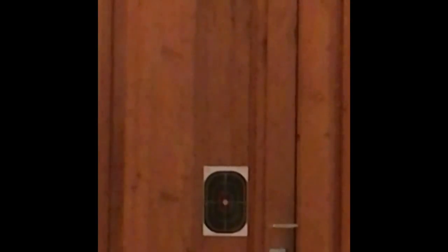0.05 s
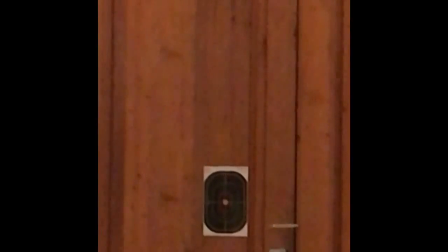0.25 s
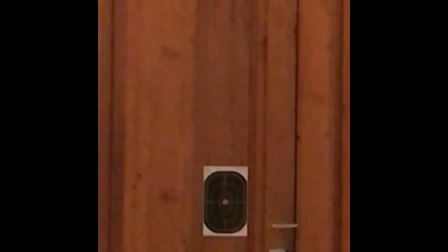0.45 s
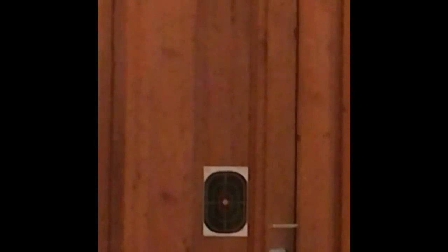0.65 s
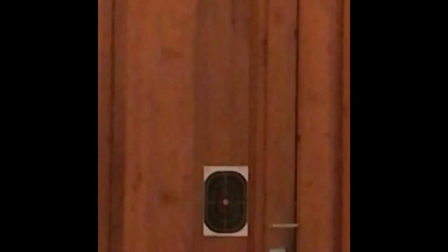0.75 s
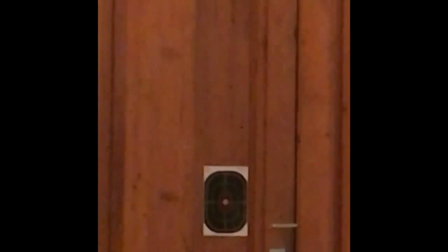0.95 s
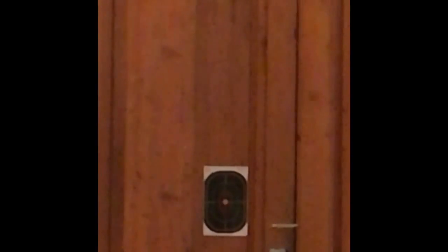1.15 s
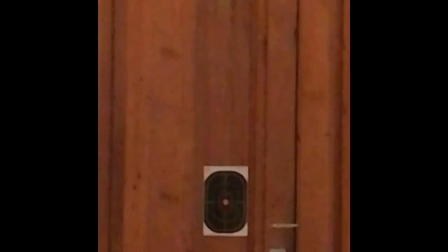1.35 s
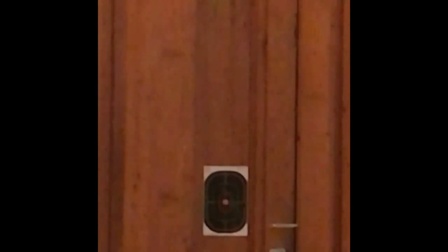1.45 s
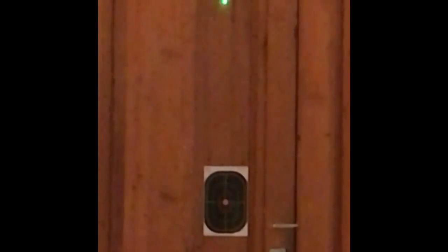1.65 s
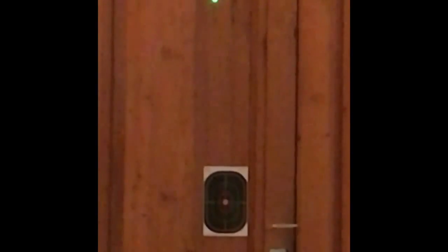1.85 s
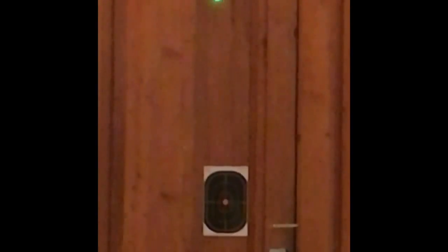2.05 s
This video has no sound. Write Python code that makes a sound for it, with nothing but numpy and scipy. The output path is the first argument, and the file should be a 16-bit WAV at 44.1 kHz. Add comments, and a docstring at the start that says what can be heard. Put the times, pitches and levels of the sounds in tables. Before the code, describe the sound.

A pistol dry-fires with one sharp, ringing metallic click in a quiet room.

```python
"""A fan hums in a quiet wood-panelled room. Very close by, a pistol settles softly in the hand. At about 1.8 s
it is fired empty: the catch slips and the striker (the firing pin) scrapes forward, slams home and rebounds.
The steel rings, a low thump follows, the spring sings and the room answers. A limiter turns everything down for
a moment, then lets the echo and the fan back up, just as a finger lightly taps the gun at 2 s."""
import sys
import numpy as np
from scipy import signal
from scipy.fft import rfft, irfft
from scipy.io import wavfile
from scipy.ndimage import uniform_filter1d, minimum_filter1d

SR = 44100
rng = np.random.default_rng(int(sys.argv[2]) if len(sys.argv) > 2 else 0)


def wav_out(sig):
    """Save sig, one row per channel (or a flat mono array), as 16-bit PCM at SR to the path in sys.argv[1]."""
    wavfile.write(sys.argv[1], SR, np.round(np.clip(np.atleast_2d(sig).T, -1, 1) * 32767).astype(np.int16))


N = 93403
BLOW_S = 1.7908  # when the striker slams home


def amp(db):
    """Turns decibels into a number to multiply by."""
    return 10 ** (np.asarray(db) / 20)


def unit(x):
    """Scales a sound to an average strength (rms) of 1."""
    return x / np.sqrt(np.mean(x ** 2) + 1e-20)


def read(points, hz):
    """Reads between the rows of a (frequency [Hz], value) table, on a log-frequency scale."""
    row_hz, value = np.transpose(points)
    return np.interp(np.log(hz + 1), np.log(row_hz + 1), value)


def colour(x, points):
    """Filters by a (frequency [Hz], level [dB]) table, keeping sudden starts sharp."""
    log_gain = np.log(amp(read(points, abs(np.fft.fftfreq(4096, 1 / SR)))))
    response = np.exp(np.conj(signal.hilbert(log_gain)))  # minimum phase: nothing sounds early
    taps = np.fft.ifft(response).real
    return signal.fftconvolve(x, taps[:len(taps) // 2])[:N]


def since(s):
    """Seconds since the moment s, negative before it."""
    return np.arange(N) / SR - s


def fade(s, db, fade_s):
    """A level that jumps up at the moment s, then drops 60 dB over the fade time."""
    t = since(s)
    return (t >= 0) * amp(db) * np.exp(-np.log(1000) * np.clip(t / fade_s, 0, 10))


def ring(s, hz, db, fade_s):
    """One fading tone, struck at the moment s."""
    return fade(s, db, fade_s) * np.sin(2 * np.pi * hz * since(s))


def narrow_noise(hz, width):
    """Noise gathered around one pitch; at 0 Hz, a slow drift."""
    offset = (np.fft.rfftfreq(N, 1 / SR) - hz) / width
    return unit(irfft(rfft(rng.standard_normal(N)) / (1 + offset ** 2), N))


# the rush of the fan's air (frequency [Hz], relative level [dB])
AIR_COLOUR = [(20, -19), (35, -4.5), (55, -9), (70, 2), (110, -7.5), (220, -12), (420, -10.5), (480, -14.5),
              (620, -3.5), (750, -19), (890, -11.5), (1100, -26), (1650, -22), (2200, -30.5), (4200, -33),
              (7000, -38), (11000, -41.5), (16000, -40.5)]
# pitches at which that air rings (frequency [Hz], width [Hz], level [dB])
AIR_RINGS = [(584.6, 24.4, -60.5), (1649.6, 32.8, -78.5)]
# the hum of the motor (frequency [Hz], level [dB])
MOTOR_TONES = [(118.4, -73), (156.5, -64), (338.5, -66)]
def fan():
    """Air rushes steadily and rings at two pitches, while the motor's tones waver slightly."""
    waver_hz, waver_rad, waver_db = 4.04, 0.825, 2
    hz = np.fft.rfftfreq(N, 1 / SR)
    air = irfft(rfft(rng.standard_normal(N)) * amp(read(AIR_COLOUR, hz)), N)
    out = amp(-57) * unit(air)
    for centre, width, db in AIR_RINGS:
        out += amp(db) * narrow_noise(centre, width)
    for centre, db in MOTOR_TONES:
        tone = np.sin(2 * np.pi * centre * since(0) + waver_rad * narrow_noise(0, waver_hz))
        out += amp(db + waver_db * narrow_noise(0, waver_hz)) * unit(tone)
    return out


# the echo off the wooden walls (frequency [Hz], relative level [dB], fade time [s])
ROOM_ECHO = [(55, -37, 0.24), (150, -39, .22), (548, -24.5, 0.355), (1128, -16, 0.519), (1610, -8.5, 0.666),
             (2042, 0.5, 0.696), (2730, -7, 0.562), (4014, -2, 0.686), (5010, -0.5, 0.574),
             (6300, 3, 0.649), (8400, 3, 0.521), (9380, 2, 0.557), (10600, 1, 0.461), (12530, -1, 0.429),
             (15900, -1, 0.407)]
def room(x):
    """Many reflections blur into one echo, each pitch dying away at its own speed."""
    table = np.array(ROOM_ECHO)
    hz, t, bands = signal.stft(rng.standard_normal(SR), SR, nperseg=256)
    fade_s = read(table[:, ::2], hz)[:, None]
    tail = signal.istft(bands * np.exp(-np.log(1000) * t / fade_s), SR, nperseg=256)[1]
    tail *= np.arange(len(tail)) / SR > 0.0046  # silent until the first reflection
    echo = signal.fftconvolve(x, tail / np.linalg.norm(tail))[:N]
    return amp(-4) * colour(echo, table[:, :2])


# the gun's bump against the hand (time [s], frequency [Hz], level [dB], fade time [s])
HAND_BUMP = (1.57, 52.5, -34, 0.0344)
def settle():
    """The gun settles in the hand with one soft, low bump."""
    return ring(*HAND_BUMP)


# the tone of the tapped gun (time [s], frequency [Hz], level [dB], fade time [s])
TAP_TONE = (2, 2851.5, -42, 0.17)
def finger_tap():
    """A finger taps the gun: a soft tick and one short tone."""
    tick = fade(TAP_TONE[0], db=-48, fade_s=0.0088) * rng.standard_normal(N)
    return tick + ring(*TAP_TONE)


# a dull, low swell of noise (frequency [Hz], relative level [dB])
LOW_SWELL_COLOUR = [(30, -14.5), (110, -4), (180, 4), (320, -16), (430, -3), (800, -28.5), (2500, -60.5)]
def low_swell():
    """A brief, dull, low swell leads into the blow."""
    rise_s, fall_s = 0.00496, 0.00076
    t = since(BLOW_S)
    swell = np.exp(-abs(t) / np.where(t < 0, rise_s, fall_s))
    return amp(-11) * swell * unit(colour(rng.standard_normal(N), LOW_SWELL_COLOUR))


# the thin tones of the striker's spring (frequency [Hz], relative level [dB], fade time [s])
SPRING_TONES = [(2097, -12.5, 0.47), (3575, -7, 0.484), (4716, -4.5, 0.265), (5961, -0.5, 0.366),
                (5993, -3.5, 0.605), (7483, -6, 0.375), (8605, -2, 0.226), (9177, 2.5, 0.383),
                (9370, 3, 0.448), (9406, -0.5, 0.43), (9523, 3, 0.32), (11181, -1, 0.267), (11214, -4, .3),
                (12807, 0, 0.41)]
def spring():
    """The released spring sings on after the blow; tones close in pitch pulse against each other."""
    return amp(-30) * sum(ring(BLOW_S + rng.random() / 1000, *tone) for tone in SPRING_TONES)


# the low thump (frequency [Hz], level [dB], fade time [s])
THUMP_TONES = [(59.4, 6, 0.0503), (175.1, 0.5, 0.027), (267, -11.5, 0.0295), (405.6, -5.5, 0.0273),
               (898, -8.5, 0.0047)]
def thump():
    """A low thump follows the blow; every second tone starts by swinging the other way."""
    return sum((-1) ** k * ring(BLOW_S, *tone) for k, tone in enumerate(THUMP_TONES))


# steel hitting steel (time [s], relative level [dB], contact length [s], knock level [dB])
STEEL_HITS = [(1.7675, -29, 0.000604, -24), (1.7715, -40.5, 0.00074, -45), (1.7794, -34.5, 0.00083, -28),
              (1.784, -25.5, 0.00073, -28.5), (1.7860, -20, 0.0021, -25.5), (1.7904, -4.5, 0.00036, -28.5),
              (1.7910, 2.5, 0.000809, 8.5), (1.793, -2.5, 0.00129, -31), (1.7954, 0, 0.001328, -28)]
# the bare crack of a hit (frequency [Hz], relative level [dB])
CRACK_COLOUR = [(200, -22), (700, -1), (1500, 0.5), (2050, -3.5), (2700, 6.5), (4000, 0), (5200, 0),
                (8000, -3), (9500, 3), (10400, -2.5), (12700, 3.5), (14500, -4), (16000, 0)]
# the short ring of slide and barrel (frequency [Hz], relative level [dB], fade time [s])
STEEL_TONES = [(2060, -17.5, 0.047), (3556, -12.5, 0.0366), (4433, -7, 0.0417), (4552.5, -3, 0.0467),
               (6004, -6.5, 0.0316), (7490, -11, 0.0514), (9185, -6, 0.037), (9380, -3.5, 0.0285),
               (9549, -0.5, 0.0426), (11220, -11, 0.041), (12622, -10, .035), (12807, -2.5, 0.038),
               (13363, -2, .04)]
def firing_parts():
    """Each hit inside the gun gives a dull knock and a gritty crack; hard ones make the steel ring."""
    knock_s = 0.000297
    hardness = 1.57  # a hit 1 dB harder rings this many dB louder
    cracks, knocks, rings = np.zeros((3, N))
    for s, db, contact_s, knock_db in STEEL_HITS:
        t = since(s)
        grit = rng.choice([-1., 1.], N)
        cracks += amp(db) * grit * (t >= 0) * np.exp(-abs(t) / contact_s)
        age = np.maximum(t, 0) / knock_s
        knocks += amp(knock_db) * age * (2 - age) * np.exp(-age)  # one push and a swing back
    for hz, tone_db, fade_s in STEEL_TONES:
        energy = sum(fade(s, hardness * db + tone_db, fade_s) ** 2 for s, db, *_ in STEEL_HITS)
        rings += np.sqrt(energy) * np.sin(2 * np.pi * (hz * since(0) + rng.random()))
    return knocks + amp(-2.5) * colour(cracks, CRACK_COLOUR) + amp(-18) * rings


def scene():
    """The close sounds, their echo, the spring and the fan, in one channel."""
    close = firing_parts() + low_swell() + thump() + settle() + finger_tap()
    return (close + room(close) + spring() + fan())[None]


def record(dry):
    """Trims deep bass and top treble; a limiter turns a loud moment down, waits and comes back up."""
    low_cut_hz, high_cut_hz = 38.43, 15850
    limit_db, ratio, hold_s, recover_db_per_s = -12, 4.17, 0.1912, 249.5
    x = signal.sosfilt(signal.butter(4, low_cut_hz, "high", fs=SR, output="sos"), dry[0])
    level_db = 10 * np.log10(abs(uniform_filter1d(x ** 2, size=256)) + 1e-12)
    cut_db = np.maximum(level_db - limit_db, 0) * (1 - 1 / ratio)
    half_hold = int(hold_s * SR / 2)
    held_db = -minimum_filter1d(-cut_db, 2 * half_hold + 1, origin=half_hold, mode="constant")
    ramp_db = since(0) * recover_db_per_s
    dip_db = np.maximum.accumulate(held_db + ramp_db) - ramp_db  # lets go at a steady speed
    x = x * amp(-uniform_filter1d(dip_db, size=64))
    x = x / (1 + x ** 6) ** (1 / 6)  # rounds off the peaks
    low_pass = signal.firwin(511, high_cut_hz, window=("kaiser", 9), fs=SR)
    return signal.oaconvolve(x, low_pass, "same")[None]


dry = scene()
out = record(dry)
wav_out(out)
```